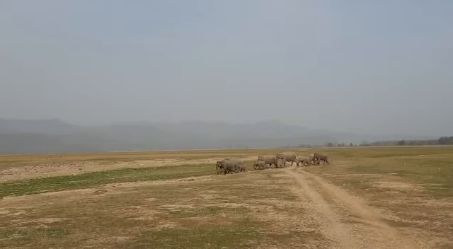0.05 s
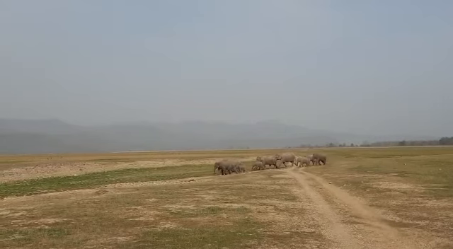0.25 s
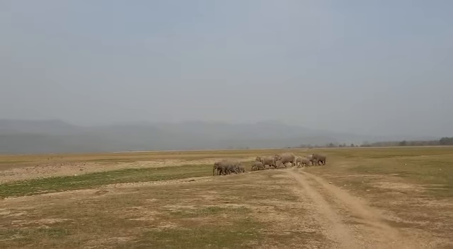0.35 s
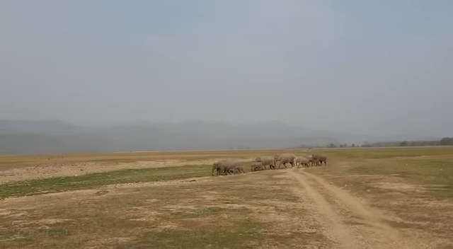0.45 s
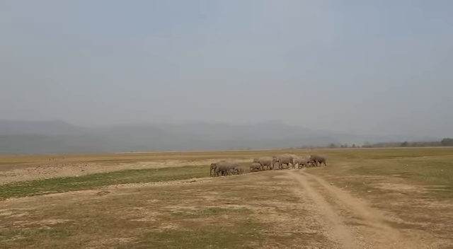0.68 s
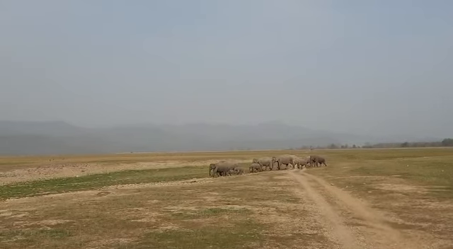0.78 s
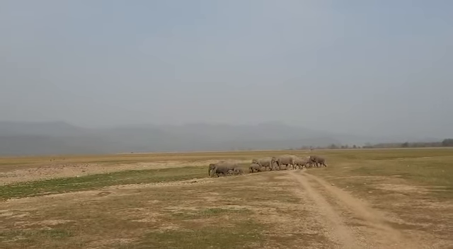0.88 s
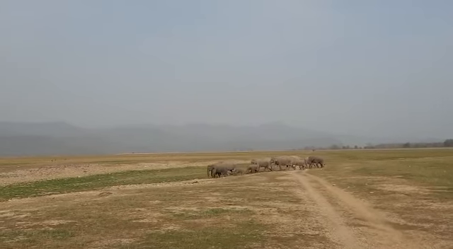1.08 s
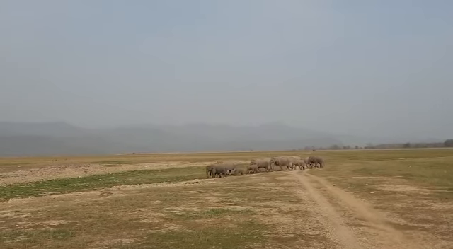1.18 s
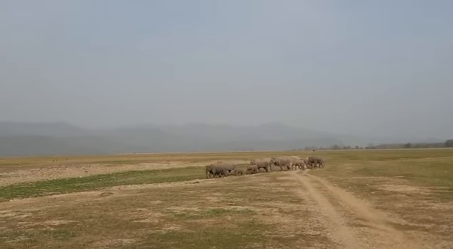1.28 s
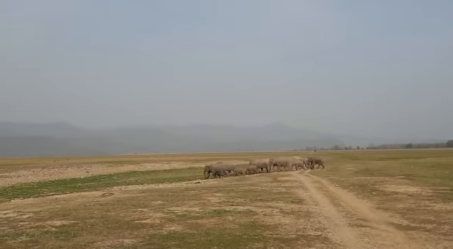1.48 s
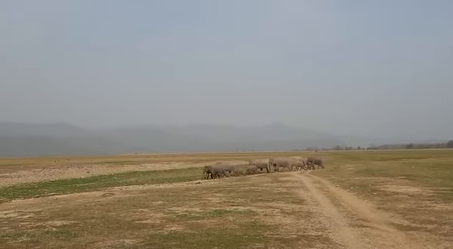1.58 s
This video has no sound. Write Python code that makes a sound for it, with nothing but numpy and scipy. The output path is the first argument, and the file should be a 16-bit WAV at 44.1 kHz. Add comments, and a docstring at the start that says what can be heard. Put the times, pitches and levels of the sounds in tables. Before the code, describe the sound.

Close by, a still camera shoots a continuous burst of sharp clacks, each with a brief motor whirr. Probably a second camera clicks briefly at first. Gusts buffet the microphone over a faint outdoor hiss.

```python
"""Sharp clacks and a whirr, five times a second: a still camera shoots a burst close to the microphone,
on open grassland. Each frame is three clacks (mirror, shutter, mirror return) and the recocking motor.
Uneven wind rumbles and sputters on the microphone ports throughout, over a faint steady hiss.
Brighter clicks, probably a second camera, stop early on."""
import sys
import numpy as np
from scipy.fft import rfft, irfft, next_fast_len
from scipy.io import wavfile
from scipy.ndimage import uniform_filter1d, map_coordinates

SR = 44100
rng = np.random.default_rng(int(sys.argv[2]) if len(sys.argv) > 2 else 0)


def wav_record(signal):
    """Record a signal, one row per channel, as 16-bit PCM in the file named by sys.argv[1]."""
    frames = np.transpose(np.atleast_2d(signal))
    bounded = np.clip(frames, -1, 1)
    # unit amplitude maps onto the largest positive 16-bit level
    quanta = np.round(bounded * 32767).astype(np.int16)
    wavfile.write(sys.argv[1], SR, quanta)


N = 72765


def amp(db):
    return 10 ** (np.asarray(db) / 20)


def unit_rms(x):
    return x / np.sqrt(np.mean(x ** 2, axis=-1, keepdims=True) + 1e-20)


def along(points, hz):
    """Read a curve of (freq_hz, value) points on a log frequency axis."""
    freqs, values = np.transpose(points)
    return np.interp(np.log(hz + 1), np.log(freqs + 1), values)


def wobble(rate_hz):
    """A smooth random curve with rate_hz knots a second."""
    knots = rng.standard_normal(int(N * rate_hz / SR) + 4)
    return map_coordinates(knots, [np.arange(N) * rate_hz / SR])


def filtered(x, response):
    """Apply a gain given as a function of frequency."""
    size = next_fast_len(N + SR // 2)
    return irfft(rfft(x, size) * response(np.fft.rfftfreq(size, 1 / SR)), size)[..., :N]


def add(track, start_s, sound):
    """Mix a sound in, cut to the ends of the track."""
    i = round(start_s * SR)
    a, b = max(i, 0), min(i + sound.shape[-1], N)
    if b > a:
        track[..., a:b] += sound[..., a - i:b - i]


# How alike the microphone's two sides are: freq_hz, correlation
STEREO_LIKENESS = [(100, 0), (700, 0), (1400, 0.63), (2300, 0.3), (3300, 0), (15000, 0.14)]
def noise(colour):
    """Coloured stereo noise of rms 1, partly alike left and right."""
    def mid_side_gains(hz):
        angle = np.arccos(np.clip(along(STEREO_LIKENESS, hz), -1, 1)) / 2
        return amp(along(colour, hz)) * [np.cos(angle), np.sin(angle)]
    mid, side = filtered(rng.standard_normal((2, N)), mid_side_gains)
    return unit_rms(np.array([mid + side, mid - side]))


def strike(t, swell_s, t60_s):
    """A contact swells to its peak at t = 0 and dies away."""
    return np.exp(np.minimum(t, 0) / swell_s - np.log(1000) * np.maximum(t, 0) / t60_s)


# Frames of the close camera's burst, already under way: start_s, gain_db
FRAMES = [(-.0802, 0.5), (0.1144, -1), (0.3119, 1), (0.5089, -2.5), (0.7057, -1), (0.9013, -1), (1.0972, 1),
          (1.295, -2.5), (1.4911, -1.5)]
# Mirror and shutter contacts within a frame: offset_s, level_db, swell_s, t60_s
CONTACTS = [(0.012, -54, .0005, 0.012), (0.019, -55.5, 0.002, .05), (0.032, -53.5, 0.0016, 0.055),
            (.035, -52.5, 0.0013, 0.1), (0.055, -52.5, 0.0013, 0.036), (.058, -54, .001, 0.055),
            (0.068, -63.5, .004, 0.084), (.082, -77, .001, .035), (0.0947, -58, 0.0019, 0.07),
            (0.11, -55.5, .001, 0.027)]
# Spectrum of a clack at close range: freq_hz, gain_db
CLACK_COLOUR = [(200, -41), (700, 15), (1100, 6), (1500, 10), (1900, 6.5), (2300, 4), (2800, -3.5),
                (3250, 6.5), (3600, 4), (4100, 3.5), (5000, 0), (7000, -3.5), (7800, 0.5), (8700, -4.5),
                (11000, -17), (15500, -22.5)]
# Lesser modes of the mirror box, rung with its main ping: pitch_hz, gain_db, t60_s
BOX_MODES = [(1393, -3.5, 0.048), (3350, -18, 0.075), (4730, -30, 0.0098), (6250, -13.5, 0.031),
             (7300, -13.5, 0.031)]
def shutter():
    """Each contact rattles the camera body; the returning mirror also rings its box."""
    return_s, ring_swell_s, modes_db = 0.0575, 0.00078, -49
    ping_hz, ping_db, ping_t60_s = 4030, -48, 0.019
    t = np.arange(-SR // 50, SR // 8) / SR
    power, ring = np.zeros(N), np.zeros((2, N))

    def mode(hz, t60_s, stereo_cycles):
        return strike(t, ring_swell_s, t60_s) * np.sin(2 * np.pi * (hz * t + rng.random() + stereo_cycles))

    for start_s, frame_db in FRAMES:
        for offset_s, db, swell_s, t60_s in CONTACTS:
            scatter_db = 1.37 * rng.normal()
            contact = amp(db + frame_db + scatter_db) * strike(t, swell_s, t60_s)
            add(power, start_s + offset_s + t[0], contact ** 2)
        modes = sum(amp(db) * mode(hz, t60_s, rng.random((2, 1)) / 5) for hz, db, t60_s in BOX_MODES)
        ping = mode(ping_hz, ping_t60_s, np.array([[0], [1 / 6]]))
        box = amp(ping_db) * ping + amp(modes_db) * modes
        add(ring, start_s + return_s + t[0], amp(frame_db) * box)
    clacks = np.sqrt(power) * noise(CLACK_COLOUR)
    rattle = unit_rms(amp(1.35 * wobble(1300)))
    return clacks * rattle + ring


# Spectrum of the motor's whirr at close range: freq_hz, gain_db
MOTOR_COLOUR = [(300, -6), (900, -1.5), (1500, -2.5), (2500, 5), (4500, -1), (6300, -4.5), (8000, -4),
                (9200, -16.5), (11500, -20), (15500, -30)]
# Resonances of the motor's housing: pitch_hz, width_hz, gain_db
HOUSING_MODES = [(1430, 67, 5), (1550, 94, 19.5), (1953, 110, 13.5), (2084, 110, 5), (3460, 270, -0.5),
                 (3960, 220, 6), (7370, 320, 3.5)]
def motor():
    """In each frame the motor starts, takes up the spring's load and coasts to rest; its gears chatter."""
    on_s, load_s, stop_s = 0.0583, 0.099, 0.12
    loaded_db, idle_db, coast_db_per_s = -60, -2.5, 430
    gear_hz, gear_depth = 353.7, 0.12
    t, drive = np.arange(SR // 5) / SR, np.zeros(N)
    load_db = np.interp(t, [on_s - 0.01, on_s, load_s - 0.005, load_s], [-50, idle_db, idle_db, 0])
    coast_db = coast_db_per_s * np.maximum(t - stop_s, 0)
    for start_s, frame_db in FRAMES:
        add(drive, start_s, amp(loaded_db + frame_db + load_db - coast_db))
    tooth_hz = gear_hz * (1 + 0.18 * wobble(50))
    teeth = 1 + gear_depth * np.sin(2 * np.pi * np.cumsum(tooth_hz) / SR)
    flicker = amp(0.5 * wobble(500))

    def housing(hz):
        return amp(sum(db / (1 + (2 * (hz - pitch) / width) ** 2) for pitch, width, db in HOUSING_MODES))

    whirr = filtered(noise(MOTOR_COLOUR), housing)
    return drive * unit_rms(teeth * flicker * whirr)


def turbulence(gusts, churn, eddy_s, flutter_hz):
    """Eddies at each port: noise, evened out over eddy_s, flutters and swells with the gusts."""
    times, levels, pans = np.transpose(gusts)
    t = np.arange(N) / SR
    level_db, pan_db = np.interp(t, times, levels), np.interp(t, times, pans)
    balance = amp(np.array([pan_db, -pan_db]) / 2)
    balance /= np.sqrt(np.mean(balance ** 2, axis=0))
    local_power = abs(uniform_filter1d(churn ** 2, int(eddy_s * SR)))
    even_churn = churn / np.sqrt(local_power + 1e-6)
    flutter = amp([wobble(flutter_hz), wobble(flutter_hz)])  # about 1 dB
    return amp(level_db) * balance * unit_rms(even_churn * flutter)


# Gusts off the grassland, felt as rumble at the microphone: time_s, level_db, left_minus_right_db
RUMBLE_GUSTS = [(0.0, -44, -11), (0.05, -65, -17), (0.124, -72.5, -26), (0.192, -57, -36),
                (0.216, -44, -23), (0.242, -50.5, -9), (0.284, -69.5, -32), (0.34, -40.5, -5),
                (0.362, -36.5, -13), (0.386, -55, -32), (0.418, -33.5, -4.0), (0.444, -39.5, -9.5),
                (0.49, -42, -33), (0.564, -75.5, 0), (0.592, -62, -20.0), (0.628, -50, -8),
                (0.716, -55, -38), (0.744, -71, -21), (0.784, -44.5, -21), (0.872, -48.5, -25),
                (0.9, -60, -24), (0.974, -53, -32), (0.992, -40.5, -21), (1.028, -45, 1),
                (1.066, -44.5, 2.5), (1.102, -36, 5), (1.138, -43.5, -4.5), (1.204, -42.5, -43),
                (1.262, -46.5, 3), (1.308, -75, -34.5), (1.378, -61, -41), (1.42, -45, -3),
                (1.53, -54.5, -8), (1.584, -57.5, -4), (1.63, -51.5, -25), (1.65, -58, -28)]
# Spectrum of the rumble: freq_hz, gain_db
RUMBLE_COLOUR = [(15, -43), (30, -16.5), (60, -5.5), (115, 0.5), (170, -10), (260, -9.5), (500, -36),
                 (1500, -88)]
def wind_rumble(gain_db=3):
    """Uneven wind on the microphone makes a deep rumble."""
    return amp(gain_db) * turbulence(RUMBLE_GUSTS, noise(RUMBLE_COLOUR), eddy_s=0.0302, flutter_hz=45)


# Gusts right on the microphone ports: time_s, level_db, left_minus_right_db
BUFFET_GUSTS = [(0.0, -44.5, 3), (0.032, -61.5, -14), (0.054, -52.5, 29), (0.09, -61.5, 6),
                (0.142, -56, 25), (0.17, -60.5, 34), (0.202, -55, -3), (0.224, -44.5, -5),
                (0.252, -45.5, 2), (0.298, -63, 21), (0.334, -45.5, -8), (0.408, -36.5, -10),
                (0.426, -28.5, -11.5), (0.468, -45.5, 17), (0.486, -49.5, 1), (0.51, -41.5, -1),
                (0.542, -68, 23), (0.574, -52.5, 10), (0.596, -72, 5), (0.614, -53, -14),
                (0.726, -57.5, 70), (0.772, -57.5, 22), (0.79, -40, -2), (0.822, -61, 18),
                (0.836, -53.5, -11), (0.872, -47, 23), (0.89, -65, 22), (0.918, -44, 21.0),
                (0.954, -70, 19), (0.974, -41.5, 2), (1.01, -39.5, -36), (1.046, -41.5, -6),
                (1.07, -30, -6.5), (1.088, -55, -6), (1.102, -33.5, -8), (1.126, -52, 6), (1.138, -40, -4),
                (1.258, -47.5, -7), (1.29, -85, -24), (1.354, -61.5, 29), (1.4, -54.5, -6),
                (1.474, -55.5, -3), (1.492, -57, -8), (1.552, -65, 2.5), (1.626, -47.5, 4), (1.65, -61, -2)]
# Spectrum of the buffeting at each port: freq_hz, gain_db
LEFT_PORT_COLOUR = [(90, -44), (180, -13.5), (260, -22), (360, -2), (460, -7), (600, -15), (800, -10),
                    (1200, -45), (2500, -31), (6000, -86)]
RIGHT_PORT_COLOUR = [(90, -8.5), (180, -1.5), (270, -2), (370, -2.5), (460, -5), (600, -20), (800, -20.5),
                     (1200, -25.5), (2500, -43), (6000, -86)]
# Overall tone of the buffeting on both sides: freq_hz, gain_db
BUFFET_SHAPE = [(120, -9), (220, -2), (330, 4), (540, 0), (700, -1.5), (900, -17), (2000, -6)]
def wind_buffet(gain_db=0.5):
    """Wind buffets the ports with a hollow sound; each port has its own pitch."""
    hollow = np.array([noise(LEFT_PORT_COLOUR)[0], noise(RIGHT_PORT_COLOUR)[1]])
    buffet = turbulence(BUFFET_GUSTS, hollow, eddy_s=0.0161, flutter_hz=130)
    return amp(gain_db) * filtered(buffet, lambda hz: amp(along(BUFFET_SHAPE, hz)))


# Background of the open grassland: freq_hz, gain_db
AIR_COLOUR = [(30, 9), (300, -2.5), (1000, 3.5), (1600, 7.5), (2600, -0.5), (5000, -6.5), (8000, -13),
              (12000, -12), (15500, -11)]
def open_air(level_db=-74):
    """A faint, steady hiss lies under everything."""
    return amp(level_db) * noise(AIR_COLOUR)


# Brighter clicks to one side of the microphone: start_s, level_db, t60_s
BRIGHT_CLICKS = [(0.015, -55, 0.03), (0.048, -62, 0.21), (0.059, -49.5, 0.05), (0.093, -53.5, 0.059),
                 (0.101, -55.5, 0.1), (0.1118, -45, 0.03), (0.119, -64, 0.035), (0.13, -56.5, 0.12),
                 (0.135, -60, 0.16), (0.173, -48, 0.013), (.198, -56, 0.12), (0.209, -51, 0.075),
                 (.237, -49, .04), (.2435, -56, 0.09), (0.253, -47.5, .035), (0.258, -44.5, 0.022),
                 (.268, -63, 0.19)]
# Spectrum of those clicks: freq_hz, gain_db
CLICK_COLOUR = [(300, 6), (1000, 10.5), (2000, 8), (4000, 8), (7000, 3), (10000, -3.5), (13000, -15),
                (15500, -8)]
def second_camera(attack_s=0.00057):
    """A short run of rattling clicks, each rising quickly and dying away."""
    t, power = np.arange(SR // 5) / SR, np.zeros(N)
    rise = 1 - np.exp(-t / attack_s)
    for start_s, db, t60_s in BRIGHT_CLICKS:
        fall = np.exp(-np.log(1000) * t / t60_s)
        add(power, start_s, (amp(db) * rise * fall) ** 2)
    clicks = np.sqrt(power) * noise(CLICK_COLOUR)
    rattle = unit_rms(amp(2.2 * wobble(1100)))
    return clicks * rattle


# Single eddies right on the left port: time_s, snap_db, thump_db
EDDIES = [(0.0886, -38, -32.5), (0.1045, -32, -43), (0.1097, -25, -44), (0.1129, -31, -33),
          (0.1758, -34.5, -30), (0.1891, -40, -29), (0.2283, -57, -25), (0.2469, -55, -27.5),
          (0.3186, -38, -36), (0.3384, -30, -19), (0.3432, -36, -23.5), (0.374, -34.5, -18.5),
          (0.3822, -36, -17), (0.3938, -54, -30.5), (0.414, -63, -11.5), (0.4284, -55, -16),
          (0.4342, -34.5, -18), (0.4392, -60, -15), (0.4569, -30.5, -14.5), (0.4685, -39, -28),
          (0.4746, -34, -34), (0.5094, -42, -36), (0.518, -28.5, -31), (0.5678, -37.5, -29.5),
          (0.5751, -32, -45), (0.6676, -55, -34.5), (0.6927, -51, -37), (0.7222, -38, -26.5),
          (0.7893, -33.5, -20), (0.8589, -31.5, -25), (0.8664, -56, -28.5), (0.8699, -40, -27),
          (0.8847, -31.5, -51), (0.9081, -33.5, -48), (0.9161, -25.5, -62), (0.9184, -28, -33),
          (0.9207, -37, -31.5), (0.9801, -31.5, -21.5), (1.0144, -63, -21.5), (1.062, -54, -23.5),
          (1.0701, -30, -22.5), (1.109, -51, -33), (1.1453, -34, -15.5), (1.1539, -49, -23),
          (1.2161, -28, -23), (1.2391, -52, -29), (1.4256, -65, -35.5), (1.468, -77, -42),
          (1.608, -40.5, -59), (1.6248, -37, -32)]
# Tone of the pops at the microphone: freq_hz, gain_db
POP_COLOUR = [(100, -7), (280, -1), (1300, 1.5), (2000, -0.5), (3000, -2.5), (6000, 0)]
def wind_pops(gain_db=-3.5, right_db=-21):
    """An eddy hits the left port: a thump of two or three cycles, a snap on top, weaker snaps around."""
    snap_hz, snap_width_hz, thump_hz, thump_width_hz = 920, 930, 410, 226
    sputter_spread_s, sputter_db, pitch_scatter = 0.005, -8, 0.1
    t, track = np.arange(-SR // 50, SR // 50) / SR, np.zeros(N)

    def swing(hz):
        pitch_hz = hz * np.exp(pitch_scatter * rng.normal())
        return np.cos(2 * np.pi * (pitch_hz * t + rng.random()))

    def snap(delay_s):
        return np.exp(-np.pi * snap_width_hz * abs(t - delay_s)) * swing(snap_hz)

    for time_s, snap_db, thump_db in EDDIES:
        snaps = snap(0) + amp(sputter_db) * sum(map(snap, rng.normal(0, sputter_spread_s, size=3)))
        thump = np.exp(-(np.pi * thump_width_hz * t) ** 2 / 2) * swing(thump_hz)
        add(track, time_s + t[0], amp(snap_db) * snaps + amp(thump_db) * thump)
    pops = filtered(track, lambda hz: amp(gain_db + along(POP_COLOUR, hz)))
    return pops * amp([[0], [right_db]])


# Balance of the cameras at the microphone: freq_hz, left_minus_right_db
CAMERA_BALANCE = [(500, 2), (1500, -1), (3300, 0.5), (5500, -3.5), (8000, -6.5), (9500, 13), (11500, 22),
                  (15000, 7)]
def scene():
    """The cameras sit to one side, so each port hears its own treble; the wind is on the ports."""
    cameras = shutter() + motor() + second_camera()
    sides = np.array([[0.5], [-0.5]])
    cameras = filtered(cameras, lambda hz: amp(sides * along(CAMERA_BALANCE, hz)))
    return cameras + wind_rumble() + wind_buffet() + wind_pops() + open_air()


def record(dry):
    """Nothing is kept above the band limit."""
    top_hz = 15750
    return filtered(dry, lambda hz: hz < top_hz)


dry = scene()
out = record(dry)
wav_record(out)
```